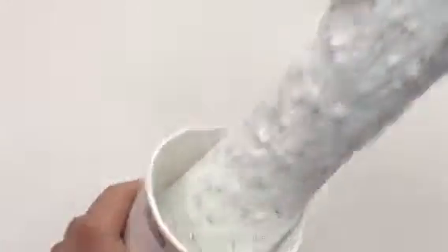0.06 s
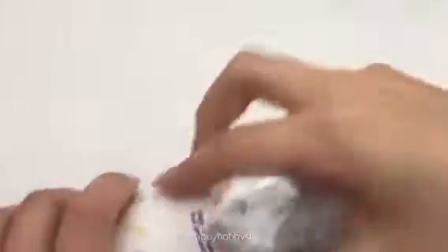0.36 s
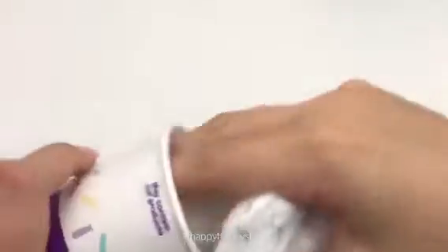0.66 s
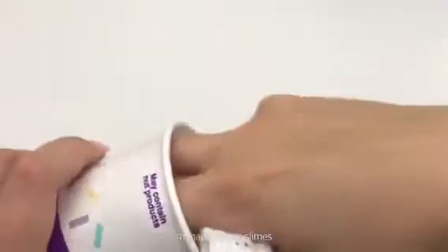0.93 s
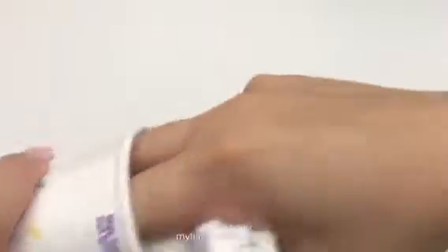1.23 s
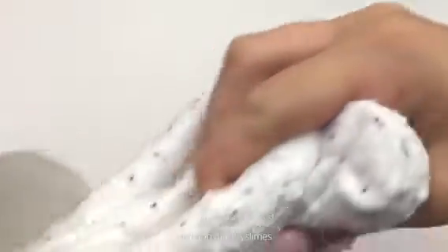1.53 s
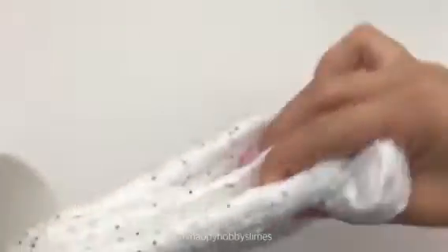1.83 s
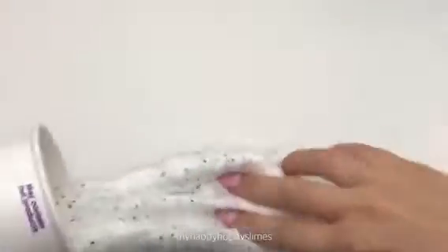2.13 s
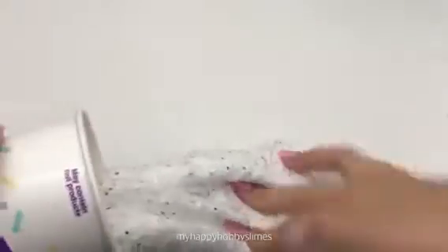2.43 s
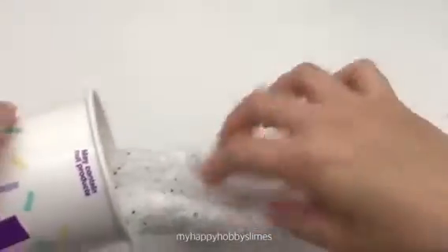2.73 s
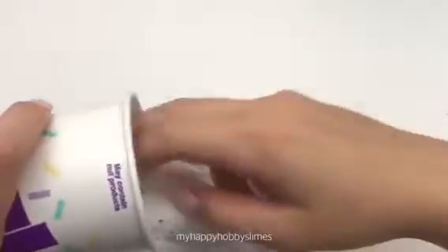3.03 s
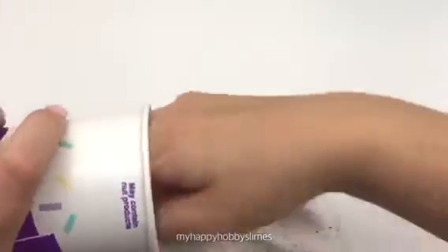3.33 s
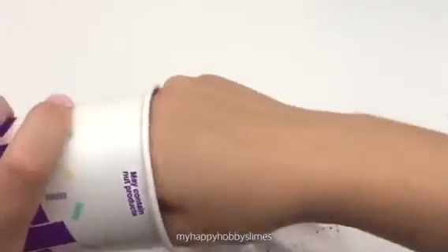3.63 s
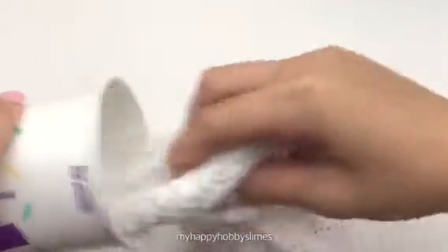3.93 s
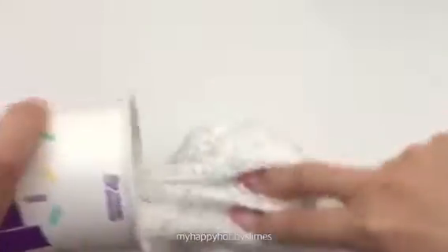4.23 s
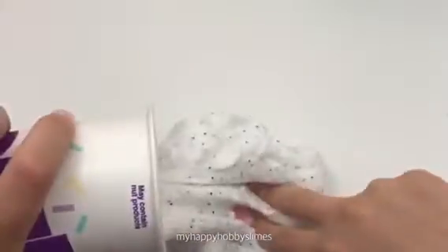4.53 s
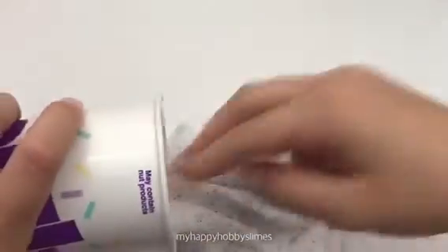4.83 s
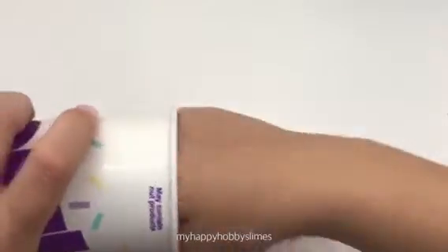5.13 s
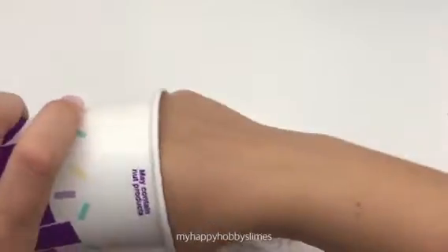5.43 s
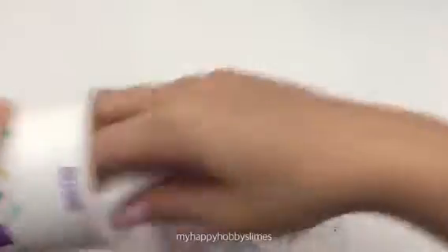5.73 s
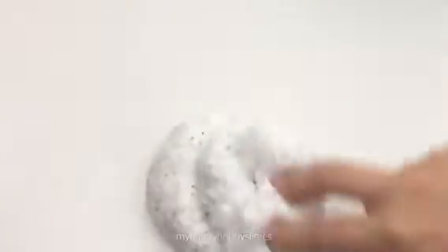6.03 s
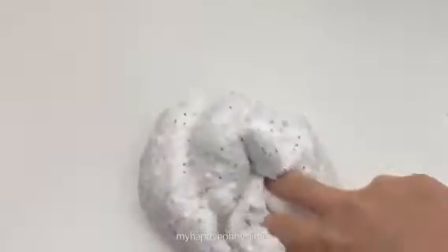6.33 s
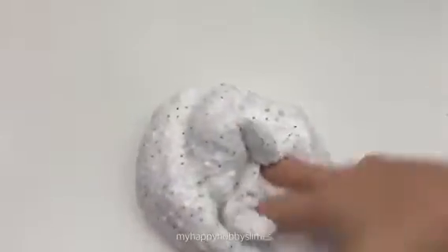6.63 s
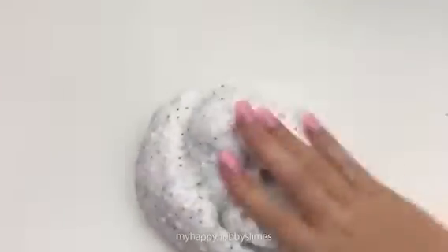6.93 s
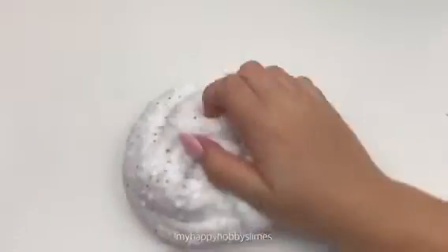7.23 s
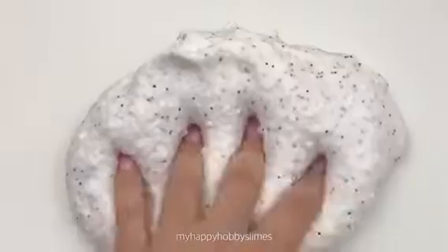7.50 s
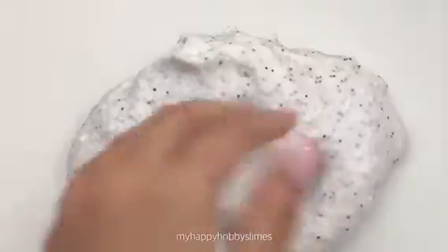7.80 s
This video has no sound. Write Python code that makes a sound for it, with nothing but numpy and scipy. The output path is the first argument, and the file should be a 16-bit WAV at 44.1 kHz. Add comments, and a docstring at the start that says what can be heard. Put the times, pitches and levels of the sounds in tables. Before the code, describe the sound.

Close, wet crackling and popping of airy slime pulled and pressed by fingers, with a few soft thuds over faint ventilation hum.

```python
"""A small quiet room with humming ventilation, where fingers close by scoop thick, airy slime out of a
paper cup, drop it on a table and poke it. Sticky friction squeaks and groans, low modes thud as the lump
is let go, and air drawn into opening cavities gulps. As the slime stretches, countless tiny air cells
burst in a random crackle; larger pockets pop, each a snap of torn film with a brief cavity resonance."""
import sys
import numpy as np
from scipy import signal
from scipy.fft import rfft, irfft, next_fast_len
from scipy.io import wavfile
from scipy.ndimage import uniform_filter1d

SR = 44100
rng = np.random.default_rng(int(sys.argv[2]) if len(sys.argv) > 2 else 0)


def put_to_file(sound):
    """Save the sound as 16-bit audio at rate SR, in the file named by the first command-line argument."""
    columns = np.atleast_2d(sound).T  # one column per channel
    safe = np.clip(columns, -1, 1)
    whole_steps = np.round(safe * 32767)
    wavfile.write(sys.argv[1], SR, whole_steps.astype(np.int16))


N = 346626
TIME = np.arange(N) / SR
BREAK_S = 7.526   # here the reverberation and the settling crackle stop dead

# Swells of crackle (squeezes, pulls and the fading hiss after loud pops): t/s at full strength, rise/s,
# hold/s, fall/s, medium-cell level/dB, coarse and fine cells/dB re medium, f/Hz of the hand-cup hollow
CRACKLE_SWELLS = [(0.0, .05, 0.031, 0.16, -62, -1, -0.5, 1130),
                  (0.151, 0.064, 0.032, 0.24, -55.5, -4.5, 0.5, 880),
                  (0.384, 0.076, 0.016, 0.081, -52.5, -0.5, -1.5, 1350),
                  (0.501, 0.039, 0.028, 0.023, -49.5, 4.5, -2.5, 1170),
                  (0.552, .03, 0.026, 0.16, -61.5, 3, -8, 1350),
                  (0.653, 0.022, 0.013, 0.44, -55.5, -13, -1, 1350),
                  (0.937, 0.2, 0.24, 0.081, -58.5, -2.5, 5.5, 1040),
                  (1.284, 0.16, 0.05, 0.15, -54, -4, 7, 890), (1.378, 0.15, 0.015, 0.35, -52, 0, 2.5, 796),
                  (1.734, 0.32, 0.061, 0.07, -57, -6, 3.5, 810),
                  (2.124, 0.11, 0.023, 0.044, -65, 0.5, 6, 890),
                  (2.285, 0.023, 0.013, 0.37, -53, -9.5, -10.5, 880),
                  (2.505, 0.053, .026, 0.11, -42.5, -10, -4, 780),
                  (2.868, 0.076, .045, 0.046, -72, 0.5, 4.5, 1810),
                  (3.097, 0.016, 0.0046, .012, -65.5, 2, 9.5, 950),
                  (3.183, .07, 0.078, 0.34, -61.5, -14, 6, 950),
                  (3.47, .13, 0.01, 0.1, -55.5, -6, 1.5, 710),
                  (3.541, 0.089, 0.032, 0.23, -62.5, -1, 1, 503),
                  (3.772, 0.11, .05, 0.21, -54.5, -17, 5, 510),
                  (3.982, 0.18, 0.014, .025, -45.5, -1.5, 1.5, 783),
                  (4.026, 0.037, 0.0092, 0.1, -60.5, -7, -0.5, 780),
                  (4.189, 0.054, 0.033, 0.1, -60, -5, 5, 716), (4.715, 0.045, 0.02, 0.034, -47, -5, 3, 670),
                  (5.076, 0.0098, 0.017, 0.1, -60, -11, 0.5, 636),
                  (5.205, 0.079, 0.033, 0.049, -56, -7.5, 2, 587),
                  (5.4, 0.16, 0.15, 0.33, -55, -1.5, -2, 630),
                  (5.489, 0.073, 0.0087, 0.12, -46, -7, 0.5, 503),
                  (5.776, 0.089, 0.046, 0.033, -45.5, 0, 5.5, 556),
                  (5.975, 0.25, 0.021, 0.028, -60, -4.5, 0.5, 810),
                  (6.09, 0.078, 0.068, 0.045, -75, 3.5, 11.5, 1080),
                  (6.304, 0.13, 0.041, 0.24, -65, -8.5, 3, 900),
                  (6.716, 0.07, 0.057, 0.022, -53.5, 0.5, 1.5, 650),
                  (7.03, 0.018, 0.037, 0.21, -61.5, 1.5, -4, 1570),
                  (7.182, .12, 0.022, 0.087, -59, -0.5, 4.5, 1570),
                  (7.338, 0.029, 0.034, 0.32, -57.5, -8.5, 9.5, 950),
                  (7.493, 0.043, 0.0042, 0.053, -54.5, 2.5, 10, 930),
                  (7.722, 0.041, 0.0059, 0.04, -48, 0, 8, 740),
                  (7.751, .03, 0.055, 0.022, -51.5, -2.5, -1.5, 704)]
# Fingertips pressing in: t/s, duration/s, relative snap level/dB
FINGER_PRESSES = [(1.83, 0.5, -65), (3.025, 0.077, -58.5), (4.121, .48, -62), (6.048, .52, -65),
                  (6.975, .06, -56), (7.206, .28, -52.5), (7.602, 0.033, -66)]


def from_db(db):
    """Amplitude ratio of a level in decibels."""
    return 10 ** (np.asarray(db) / 20)


def rms_one(x):
    """Normalisation to unit rms."""
    return x / np.sqrt(np.mean(x ** 2) + 1e-20)


def steady(x, span_s):
    """Division by the running rms levels a sound but keeps its grain."""
    return x / np.sqrt(np.abs(uniform_filter1d(x * x, max(int(span_s * SR), 2))) + 1e-12)


def add(out, s, sound):
    """Superposition of a sound starting at time s."""
    start = max(int(s * SR), 0)
    out[start:start + len(sound)] += sound[:N - start]


def butter(x, hz, kind, order=2):
    """Causal, maximally flat low-, high- or band-pass."""
    sections = signal.butter(order, np.clip(hz, 10, .45 * SR), kind, fs=SR, output="sos")
    return signal.sosfilt(sections, x + 1e-18)


def resonance(hz, width_hz):
    """Filter coefficients of a damped resonator with unit peak gain."""
    r = np.exp(-np.pi * width_hz / SR)
    return np.array([1, 0, -1]) * (1 - r * r) / 2, [1, -2 * r * np.cos(2 * np.pi * hz / SR), r * r]


def colour(x, spectrum):
    """Spectral shaping by gains interpolated over log frequency."""
    hz, db = np.transpose(spectrum)
    size = next_fast_len(len(x))
    bins = np.maximum(np.fft.rfftfreq(size, 1 / SR), 1)
    gain = from_db(np.interp(np.log(bins), np.log(hz), db))
    return irfft(rfft(x, size) * gain, size)[:len(x)]


def spray(t, energy_db, fall_s):
    """Exponentially decaying noise of a given total energy."""
    puff = rng.standard_normal(len(t)) * np.exp(-t / fall_s)
    return from_db(energy_db) * puff / np.linalg.norm(puff)


def ventilation(hum_db=-1, rumble_db=-60.5):
    """A motor's line spectrum lies over the continuous spectrum of moving air."""
    motor_tones = [(75.4, -66), (118.4, -68.5), (177.6, -85)]   # f/Hz, level/dB re hum_db
    air_spectrum = [(20, -47), (35, -11.5), (52, 5), (80, -2.5), (105, -10.5), (170, -10.5), (260, -13.5),
                    (400, -17.5), (700, -27), (1500, -32), (4000, -37), (9000, -47), (15500, -39)]   # f/Hz, relative spectral level/dB
    hum = sum(from_db(db + hum_db) * np.sqrt(2) * np.sin(2 * np.pi * (hz * TIME + rng.random()))
              for hz, db in motor_tones)
    return hum + from_db(rumble_db) * rms_one(colour(rng.standard_normal(N), air_spectrum))


def reverberation(x, t60_s=0.33, wall_hz=5000, first_s=.024):
    """Diffuse wall reflections form a dull exponential tail, cut short at BREAK_S."""
    t = TIME[:SR // 2]
    tail = butter(rng.standard_normal(len(t)), wall_hz, "low") * from_db(-60 * t / t60_s) * (t > first_s)
    tail = tail / np.linalg.norm(tail)
    return sum(part * signal.fftconvolve(x * part, tail)[:N] for part in (TIME < BREAK_S, TIME >= BREAK_S))


def rubs():
    """Sticky friction on cup and table gives squeaks and groans of band-limited noise."""
    slides = [(0.535, -41.5, 3930, 1400, 0.0055), (1.37, -59.5, 256, 240, 0.073),
              (1.41, -51, 4300, 710, 0.021), (1.733, -54.5, 2900, 603, 0.014),
              (2.537, -66.5, 317, 400, 0.054), (5.5, -40.5, 3180, 700, 0.016),
              (5.523, -51.5, 400, 227, 0.069)]   # t/s, level/dB, f/Hz, bandwidth/Hz, Gaussian half-width/s
    out = np.zeros(N)
    for s, db, hz, width_hz, sigma_s in slides:
        friction = butter(rng.standard_normal(N), [hz - width_hz / 2, hz + width_hz / 2], "band")
        swell = np.exp(-.5 * ((TIME - s) / sigma_s) ** 2)
        out += from_db(db) * steady(friction, span_s=0.099) * swell
    return out


def thuds(rise_s=0.00266):
    """Damped modes of slime and table give low, soft thuds as the fingers pull free or let it drop."""
    events = [(0.365, -49, 0.02, 160), (0.518, -48, 0.037, 150), (2.276, -35, 0.012, 155),
              (2.503, -50, 0.037, 147), (4.71, -36.5, 0.03, 150.6), (6.711, -37.5, 0.035, 176),
              (6.753, -39, 0.034, 169), (7.715, -34, 0.049, 153.4)]   # t/s, level/dB before the envelope, decay time/s, main mode f/Hz
    modes = [(0.479, 0.21, -5.5), (1, 0.018, 6), (1.6, 0.39, 2), (2.25, 0.068, -8)]   # ratio to the main mode, relative bandwidth, relative level/dB
    out, t = np.zeros(N), TIME[:SR // 3]
    for s, db, fall_s, hz in events:
        force = rng.standard_normal(len(t))
        thud = np.zeros(len(t))
        for ratio, width, mode_db in modes:
            band_hz = hz * ratio * np.exp([-width / 2, width / 2])
            thud += from_db(mode_db) * steady(butter(force, band_hz, "band"), span_s=0.053)
        envelope = (1 - np.exp(-t / rise_s)) * np.exp(-t / fall_s)
        add(out, s - rise_s, from_db(db) * rms_one(thud) * envelope)
    return out


def gulps(glide_per_s=2.1, wobble=0.21, rise_share=0.28):
    """Cavity resonance: as suction lets go, air slips in with a brief, unsteady, rising note."""
    releases = [(.365, -39.5, 281, 1.1), (0.513, -37.5, 238, 1.14), (1.0995, -30, 547.8, 0.99),
                (1.358, -40, 307, 1.1), (1.472, -42, 790, 3.4), (2.274, -37.5, 335.7, 1.9),
                (3.14, -46.5, 332, 1.2), (3.603, -40, 420, 2), (3.93, -42, 616, 5.6),
                (3.99, -28.5, 1099, 2), (4.021, -35.5, 792, 3.7), (4.718, -34, 267, 2.6),
                (5.21, -35, 598, 2.1), (5.384, -42, 439, 1.9), (5.5558, -21.5, 347.4, 1.7),
                (5.826, -39, 622.5, 8), (5.993, -46.5, 653, 3), (6.736, -44, 242, 3),
                (7.715, -30.5, 249, 1.36)]   # t/s, peak level/dB, f/Hz, decay time/cycles
    out, t = np.zeros(N), TIME[:SR // 8] - .025   # t = 0 at the peak
    for s, db, hz, cycles in releases:
        age = t * hz / cycles
        envelope = np.exp(-np.where(t < 0, (age / rise_share) ** 2, age))
        unrest = wobble * rms_one(butter(rng.standard_normal(len(t)), 273, "low"))
        phase = 2 * np.pi * np.cumsum(hz * (1 + glide_per_s * t + unrest)) / SR
        add(out, s + t[0], from_db(db) * envelope * np.sin(phase))
    return out


def crackle_levels(swing_db=20, settle_db=-23, settle_db_per_s=62):
    """Incoherent powers add: rest, swells and presses set the coarse, medium and fine cells' dB."""
    rest_db = [-83, -85, -84.5]   # slime left alone: coarse, medium, fine level/dB
    press_db = [-18.5, -14, -9]   # under a fingertip: coarse, medium, fine level/dB re the press
    t = np.arange(0, TIME[-1] + .01, .001)
    power = from_db(rest_db)[:, None] ** 2 * np.ones(len(t))
    for s, rise_s, hold_s, fall_s, db, coarse_db, fine_db, _ in CRACKLE_SWELLS:
        early, late = np.maximum(s - t, 0), np.maximum(t - s - hold_s, 0)
        # after each swell the crackle lingers faintly
        release_db = np.maximum(-swing_db * late / fall_s, settle_db - settle_db_per_s * late)
        same_side = (t < BREAK_S) == (s < BREAK_S)
        envelope = from_db(db - swing_db * early / rise_s + release_db) * same_side
        power += np.outer(from_db([coarse_db, 0, fine_db]), envelope) ** 2
    for s, length_s, db in FINGER_PRESSES:
        power += np.outer(from_db(db + np.array(press_db)), (t > s) & (t < s + length_s)) ** 2
    return [np.interp(TIME, t, 10 * np.log10(band)) for band in power]


def near_reflections(x, reflect=0.2, near_s=0.000597, far_s=.0022, sway=0.301):
    """Interference with reflections off the moving hand and cup makes a drifting comb filter."""
    out, knots = x, np.arange(0, TIME[-1] + .25, .25)
    for lag_s in np.geomspace(near_s, far_s, 3):
        lag = lag_s * np.exp(sway * np.interp(TIME, knots, rng.standard_normal(len(knots))))
        out = out + reflect * np.interp(TIME - lag, TIME, x)
    return out


def hollow(x, width_hz=320, block=256):
    """The cavity of hand and cup is a resonator whose pitch glides from swell to swell."""
    s, _, hold_s, *_, hollow_hz = np.transpose(CRACKLE_SWELLS)
    hz = np.interp(TIME, s + hold_s / 2, hollow_hz)
    out, state = np.zeros(N), np.zeros(2)
    for i in range(0, N, block):
        out[i:i + block], state = signal.lfilter(*resonance(hz[i], width_hz), x[i:i + block], zi=state)
    return out


def ticks(levels, ticks_per_s=60, tick_db=20, spread_db=3):
    """Larger cells burst as sparse random impulses, each exciting one of six damped resonances."""
    _, medium_db, fine_db = levels
    scatter_db = spread_db * np.minimum(rng.exponential(1, N), 3)
    sizes = from_db((medium_db + fine_db) / 2 + tick_db + scatter_db)
    bursts = sizes * (rng.random(N) < ticks_per_s / SR)
    pitches = np.geomspace(3000, 11000, 6)
    pitch_index = rng.integers(0, len(pitches), N)
    return sum(signal.lfilter(*resonance(hz, 0.39 * hz), bursts * (pitch_index == k) + 1e-18)
               for k, hz in enumerate(pitches))


def crackle(levels, cells_per_s=5000, crowding=.55, spread_db=4, clump_db=1.5, wake_db=-4, hollow_db=3):
    """Shot noise: air cells burst at random, at a rate that rises with the crackle's level."""
    cell_spectrum = [(150, 1), (350, -3), (900, 1), (1500, -2), (2100, -3.5), (3000, 2.5), (4100, 3.5),
                     (5200, -3), (6000, -2), (7200, 1.5), (8700, 4.5), (10400, -0.5), (12000, 2.5),
                     (15500, -2)]   # f/Hz, relative spectral level/dB
    medium_db = levels[1]
    rate = cells_per_s * from_db(crowding * (medium_db - np.median(medium_db)))
    sizes = from_db(spread_db * np.minimum(rng.exponential(1, N), 4)) * rng.choice([-1, 1], N)
    # the slime sticks and slips, so bursts come in clumps
    clumps = from_db(clump_db * rms_one(butter(rng.standard_normal(N), 90, "low")))
    bursts = clumps * sizes * (rng.random(N) < rate / SR)
    # every burst leaves a diffuse wake whose power decays over 130 samples
    wake_envelope = np.sqrt(signal.lfilter([1 / 130], [1, 1 / 130 - 1], bursts ** 2 + 1e-18))
    wake = from_db(wake_db) * wake_envelope * rng.standard_normal(N)
    cells = near_reflections(colour(bursts + wake, cell_spectrum))
    coarse = butter(cells, [220, 1900], "band", order=3)
    coarse = coarse + from_db(hollow_db) * hollow(coarse)
    medium = butter(cells, [2000, 6000], "band", order=4)
    fine = butter(cells, 5500, "high", order=4)
    return sum(from_db(db) * steady(band, span_s=0.082) for band, db in zip((coarse, medium, fine), levels))


def pops(pockets, wake_db, wake_s, trim_db=-1, puff_db=-11):
    """Impulse response of a bursting pocket: the film snaps, the cavity rings, a dull puff escapes."""
    snap_modes = [(2900, 1870, 8.5), (4440, 240, -3), (7040, 410, -4.5), (8400, 670, -7)]   # resonances colouring each snap: f/Hz, bandwidth/Hz, gain/dB
    out, t = np.zeros(N), TIME[:SR // 25]
    impulse, attack = t == 0, t < .004
    for s, snap_db, snap_hz, ring_db, ring_hz in pockets:
        click = impulse + spray(t, wake_db, wake_s)   # with quick reflections off hand, cup and table
        rip = click + spray(t, energy_db=0, fall_s=0.00074)
        film = resonance(snap_hz, width_hz=2 * snap_hz)
        snap = butter(signal.lfilter(*film, signal.lfilter(*film, rip)), 2.1 * snap_hz, "low")
        snap += sum(from_db(db) * signal.lfilter(*resonance(hz, width), snap)
                    for hz, width, db in snap_modes)
        push = click + impulse
        ring = sum(from_db(db) * signal.lfilter(*resonance(ratio * ring_hz, 0.32 * ring_hz), push)
                   for ratio, db in ((1, 0), (1.72, -9)))   # fundamental and overtone
        ring = butter(ring, 1.46 * ring_hz, "low")
        puff = butter(push, [230, 750], "band")
        for sound, db in ((snap, snap_db + trim_db), (ring, ring_db + trim_db), (puff, ring_db + puff_db)):
            add(out, s, from_db(db) * sound / np.std(sound[attack]))
    return out


def bubbles(per_s=22, spread_db=4.5, snap_hz=7000, ring_hz=950, spread_octaves=0.55):
    """Fingertip pressure ruptures small bubbles one by one, scattered in time, level and pitch."""
    pockets = []
    for start_s, length_s, db in FINGER_PRESSES:
        scatter = np.clip(rng.standard_normal((40, 4)), -2, 2)
        waits_s = (np.arange(40) + rng.random(40)) / per_s
        for wait_s, (size, depth, film, cavity) in zip(waits_s, scatter):
            if wait_s < length_s:
                snap_db = db + spread_db * size
                ring_db = snap_db - 10.5 + spread_db * depth
                pockets.append((start_s + wait_s, snap_db, snap_hz * 2 ** (spread_octaves * film),
                                ring_db, ring_hz * 2 ** (spread_octaves * cavity)))
    return pops(pockets, wake_db=-9, wake_s=0.0031)


def air_pockets():
    """The stretched film over large pockets ruptures in pops that stand clear of the crackle."""
    pockets = [(0.0358, -52, 8400, -58, 1350), (0.1256, -48, 7400, -66, 820),
               (0.184, -48.5, 4300, -43.5, 1400), (0.3105, -41, 4800, -44, 1420),
               (0.3614, -28, 4200, -34.5, 1270), (0.3787, -34, 4230, -37.5, 1530),
               (0.388, -36, 8000, -42, 1660), (0.4338, -36, 3940, -34.5, 1470),
               (0.5, -39, 3880, -35.5, 1450), (0.5139, -49, 3700, -37, 1140),
               (0.5237, -27.5, 4400, -37.5, 1440), (0.5348, -33.5, 4300, -57, 1270),
               (0.6448, -21, 5860, -32, 1380), (0.6988, -39, 6130, -41, 1200),
               (0.7737, -43, 3900, -44, 1150), (1.0986, -41.5, 6500, -45.5, 613),
               (1.4002, -42, 5030, -46.5, 790), (1.7547, -45, 7500, -58, 1100),
               (2.1039, -48, 8800, -74, 1510), (2.274, -20.5, 3900, -32.5, 1670),
               (2.2772, -32, 3900, -40, 637), (2.2805, -31.5, 3830, -47, 1600),
               (2.3619, -40, 7460, -49, 1520), (2.5003, -30.5, 4500, -43.5, 1330),
               (2.5035, -36, 4150, -51.5, 900), (3.0475, -47.5, 7300, -56.5, 750),
               (3.13, -37.5, 4760, -45.5, 970), (3.1443, -33, 5030, -41, 1010),
               (3.3575, -38, 5000, -42, 1730), (3.9786, -47, 7400, -42.5, 1060),
               (3.9906, -42.5, 3560, -41, 686), (4.213, -49.5, 5600, -71, 950),
               (4.3507, -52, 5640, -75, 560), (4.4014, -58, 4950, -67, 1720),
               (4.4178, -54.5, 3800, -72, 1230), (4.477, -54.5, 5070, -67, 950),
               (4.5254, -50, 5170, -66, 1920), (4.5375, -39.5, 7000, -58, 1450),
               (4.7016, -42.5, 5300, -55.5, 1410), (5.0755, -37, 5100, -44, 737),
               (5.384, -42, 3730, -35.5, 1240), (6.0718, -57, 4380, -63, 795), (6.526, -55, 8400, -66, 807),
               (6.71, -36, 8000, -45.5, 654), (6.733, -38.5, 5420, -51.5, 706),
               (7.018, -51, 8030, -71, 518), (7.2103, -44, 8160, -50, 2000),
               (7.2407, -49.5, 7560, -54, 1740), (7.3134, -49, 4970, -59, 1800),
               (7.347, -22.5, 8200, -43.5, 940), (7.4883, -30, 7400, -47.5, 1810),
               (7.5184, -32, 8800, -53, 1700), (7.5807, -60, 8000, -82, 750),
               (7.713, -28.5, 4970, -37.5, 970), (7.7297, -32.5, 6100, -45, 610)]   # t/s, snap level/dB, snap f/Hz, ring level/dB, ring f/Hz (levels before trim)
    return pops(pockets, wake_db=1, wake_s=0.004)


def scene(pop_wet_db=-17, slime_wet_db=-20):
    """Direct sound, reverberation and background superpose in one channel."""
    levels = crackle_levels()
    slime = crackle(levels) + ticks(levels) + gulps() + rubs() + thuds()
    snaps = air_pockets() + bubbles()
    walls = reverberation(from_db(pop_wet_db) * snaps + from_db(slime_wet_db) * slime)
    return (snaps + slime + walls + ventilation())[None]


def record(dry, cutoff_hz=15500):
    """Band limiting: an elliptic low-pass cuts the top treble steeply."""
    return signal.sosfilt(signal.ellip(12, .1, 80, cutoff_hz, fs=SR, output="sos"), dry)


dry = scene()
out = record(dry)
put_to_file(out)
```